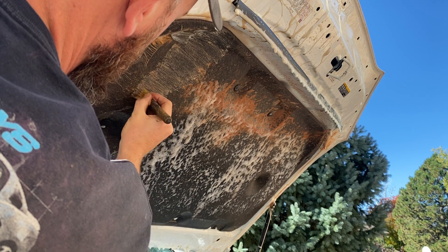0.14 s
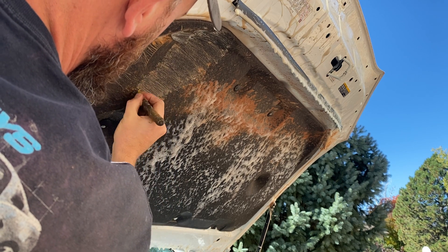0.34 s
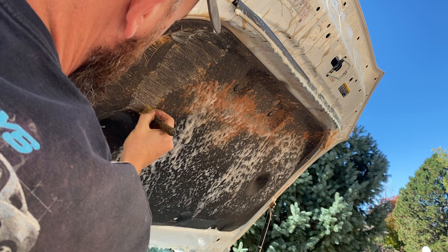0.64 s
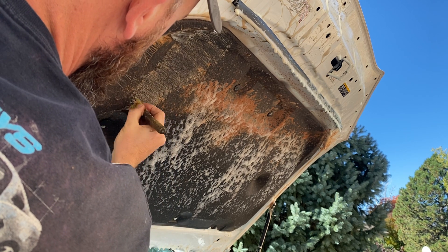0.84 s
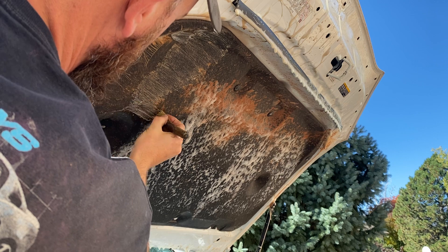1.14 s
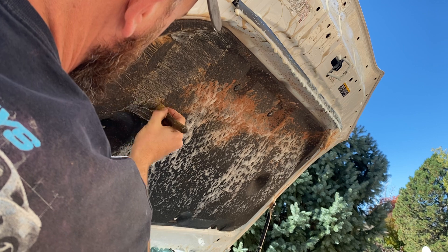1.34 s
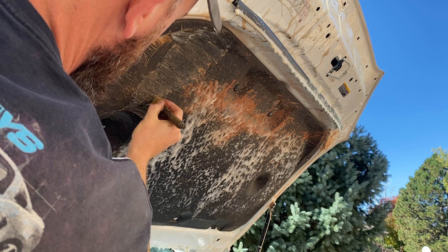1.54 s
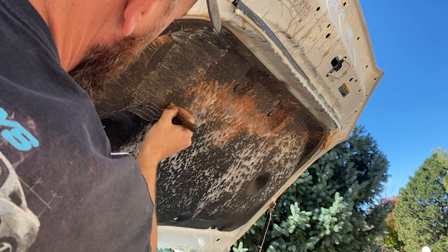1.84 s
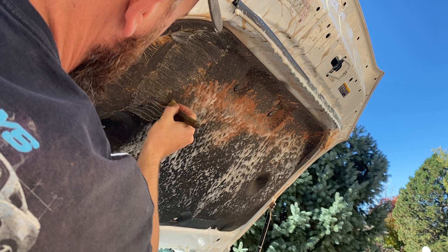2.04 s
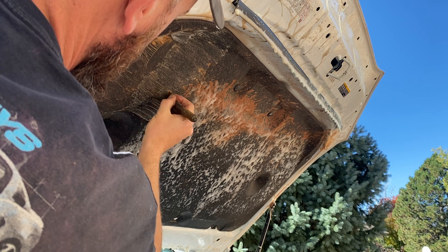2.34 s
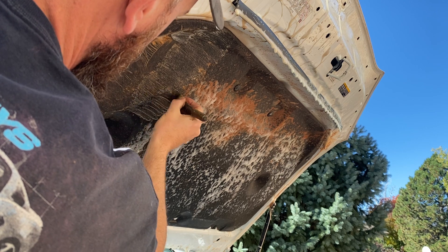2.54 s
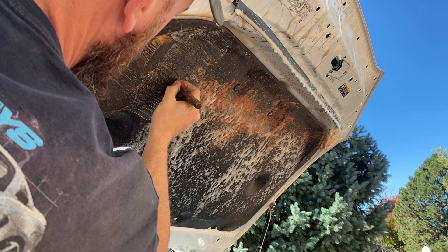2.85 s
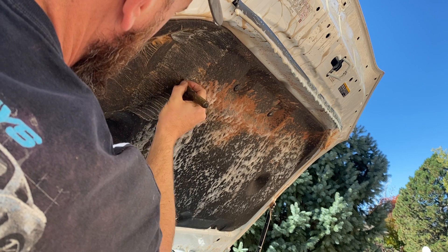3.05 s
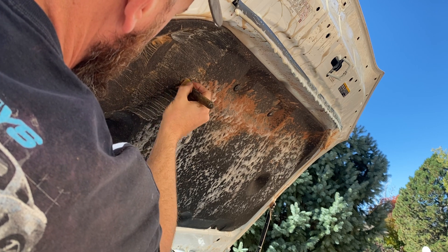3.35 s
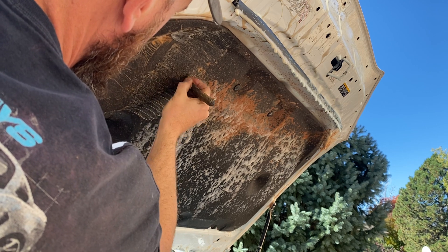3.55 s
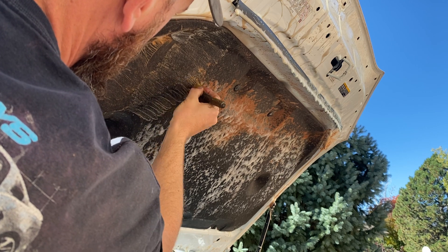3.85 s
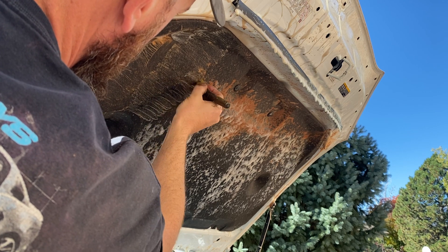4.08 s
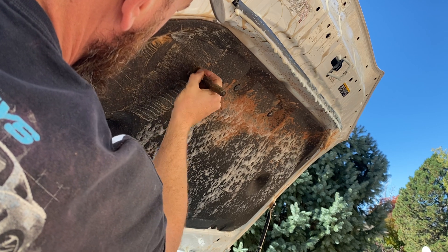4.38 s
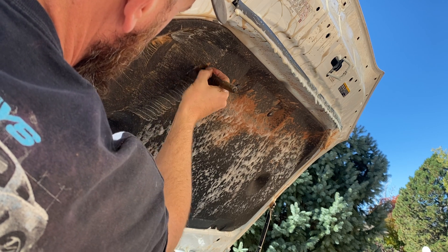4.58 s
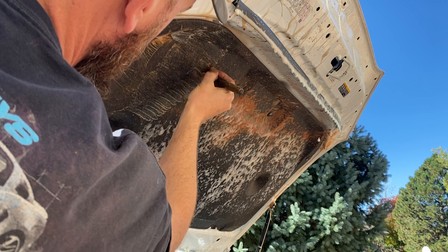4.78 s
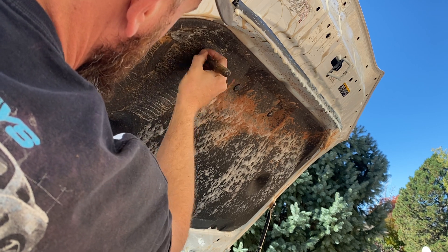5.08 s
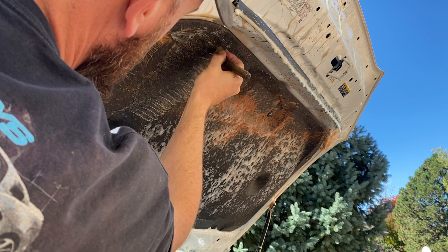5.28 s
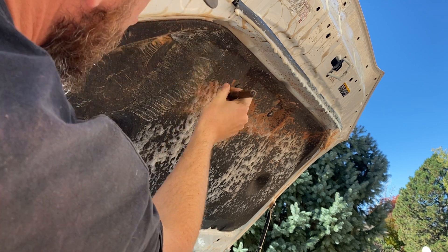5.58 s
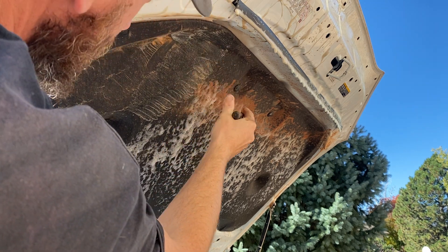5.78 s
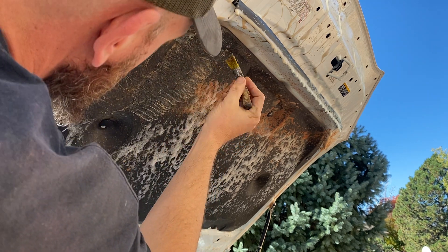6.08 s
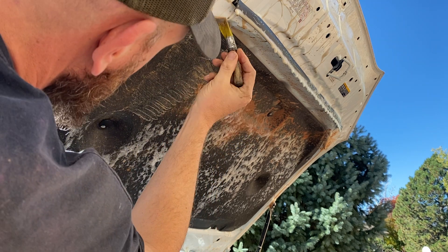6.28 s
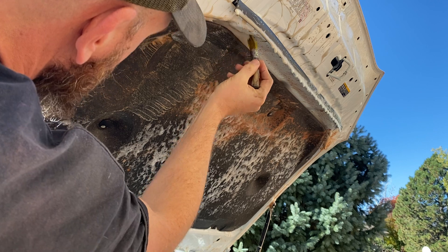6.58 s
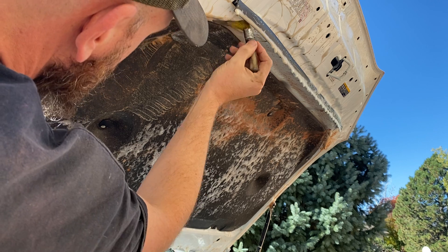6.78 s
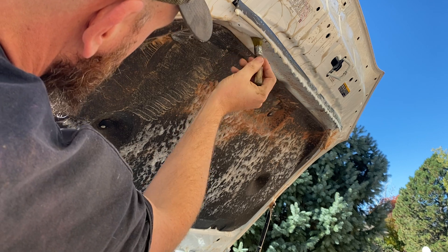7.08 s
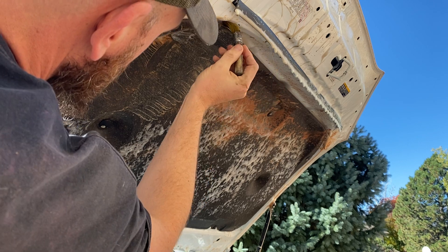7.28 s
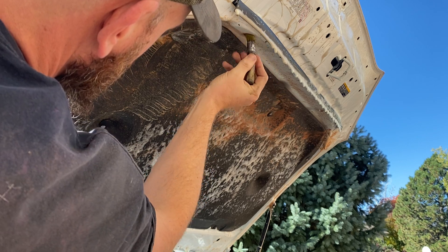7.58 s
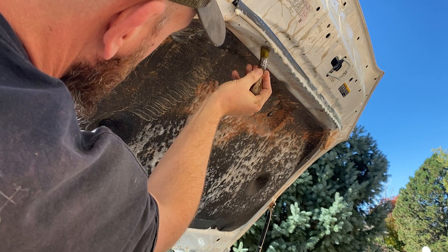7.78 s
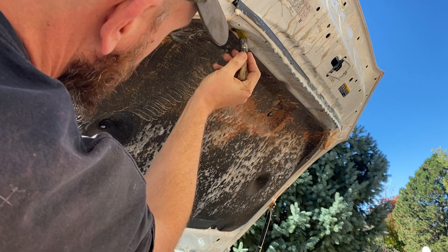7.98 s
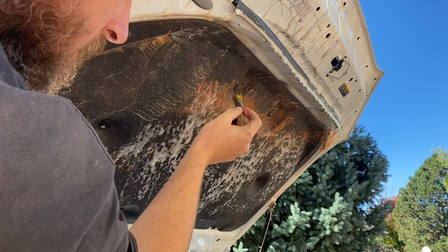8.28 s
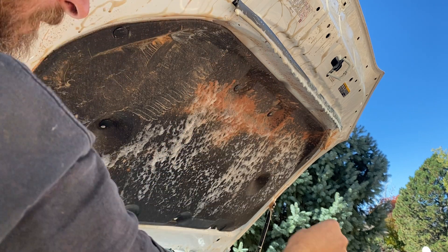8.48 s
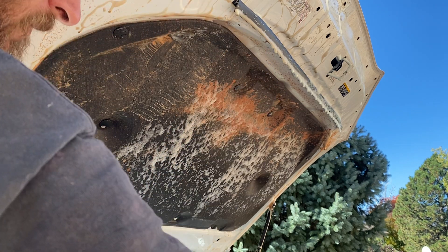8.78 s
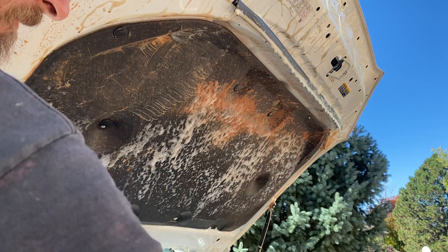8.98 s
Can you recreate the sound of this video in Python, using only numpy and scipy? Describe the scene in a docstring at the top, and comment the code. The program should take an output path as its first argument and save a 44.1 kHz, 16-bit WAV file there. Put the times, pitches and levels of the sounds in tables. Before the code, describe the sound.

Fast, dry bristle scrubbing close by over low street rumble and a swelling truck engine, then sparse gentle strokes, a cloth rustle and handle knocks.

```python
"""Outdoors, under a raised car hood, a hand scrubs a rough pad with a small brush: quick strokes, then
slower ones along the rim. Brush and sleeve are dense random ticks, coloured in stereo by short-time filtering.
The brush is put down with soft knocks, sums of decaying modes. In the street a truck pulls away, lifts off
and coasts, as wavering harmonics of its engine cycle with later engine hums; shaped noise makes the far wash
of traffic, and gliding sines a small bird. A stereo recorder is close by."""
import sys
import numpy as np
from scipy import signal
from scipy.fft import rfft, irfft, next_fast_len
from scipy.io import wavfile
from scipy.ndimage import uniform_filter1d

SR = 44100
rng = np.random.default_rng(int(sys.argv[2]) if len(sys.argv) > 2 else 0)


def pcm_store(signal):
    """Save signal as 16-bit PCM."""
    levels = np.round(np.clip(np.atleast_2d(signal), -1, 1) * 32767)
    wavfile.write(sys.argv[1], SR, levels.astype(np.int16).T)


N = 402633
TIME = np.arange(N) / SR

# street noise: (time [s], relative level of deep rumble [dB], of exhaust roar [dB], of tyre wash [dB])
STREET = [(0, -46, -55, -61.5), (.35, -46.5, -56, -59.5), (1.3, -46, -59, -58.5), (1.83, -46, -54.5, -58),
          (2.6, -46, -54, -56.5), (3.2, -41.5, -51, -54.5), (3.89, -43.5, -46, -52),
          (4.37, -41, -50.5, -56.5), (4.9, -42.5, -56, -55), (5.74, -48.5, -57.5, -57.5),
          (6.61, -47.5, -66, -57.5), (7.14, -47, -73, -59.5), (7.86, -48, -63, -58),
          (8.32, -50.5, -61.5, -60), (8.82, -46.5, -60.5, -58), (9.13, -53, -57, -57.5)]
# spectral shapes of the three street noises: (frequency [Hz], relative level [dB])
RUMBLE = [(25, -35), (40, -8.5), (60, 5), (110, -6), (170, -13), (260, -18), (400, -55)]
ROAR = [(90, -23), (160, 1), (250, 1.5), (350, -10.5), (500, -9), (800, -29), (1500, -43)]
WASH = [(180, -27), (300, -9), (417, -4), (476, -8), (744, -5.5), (863, -7.5), (1070, -8), (1180, -10.5),
        (1420, -11.5), (2040, -21), (4420, -41.5), (5760, -41), (15500, -50)]
# street at the two microphones: (frequency [Hz], likeness [0-1], phase by which right leads [rad])
STREET_PAIR = [(60.3, 0.99, 0.5), (204, 0.96, -0.5), (377, 0.84, -0.36), (760, 0.07, -2.5), (1324, 0.06, 4),
               (2580, 0.46, -7), (4350, 0.05, -6.5), (6540, 0.7, 8), (9000, 0.8, 5), (15500, .85, 9)]
# rate of the truck's engine cycle: (time [s], rate [Hz])
TRUCK_SPEED = [(0, 15.7), (.6, 16.8), (1.2, 18.2), (1.8, 19.5), (2.4, 20.6), (3, 21.56), (3.6, 22.4),
               (4.1, 22.9), (4.46, 23.1), (4.7, 21.3), (5, 18.7), (5.35, 15.9), (5.7, 14), (6.1, 13.1),
               (6.6, 12.8)]
# orders (multiples) of the cycle: (time [s], relative level of the lower order [dB], of the higher [dB])
ORDERS_3_5 = [(0, -52, -44), (.8, -50, -44.5), (1.1, -41, -38), (1.34, -48, -55), (1.55, -48.5, -38.5),
              (2.06, -49, -40.5), (2.3, -39, -31.5), (2.8, -39, -39), (3.21, -30, -30), (3.42, -36, -38),
              (3.72, -27.5, -32.5), (3.87, -44, -39.5), (4.07, -29.5, -35.5), (4.4, -32, -43.5),
              (4.51, -43.5, -38), (4.65, -24.5, -54), (4.79, -51, -60), (4.94, -36, -42), (5.25, -47, -42),
              (5.5, -43, -38.5), (5.9, -49, -43), (6.59, -60, -48)]
ORDERS_4_8 = [(0, -50, -58), (1.05, -57, -53), (1.44, -67, -61), (1.82, -49, -42.5), (2.14, -50, -54),
              (2.3, -43, -47.5), (2.66, -62, -44), (2.99, -51, -42.5), (3.3, -50, -47), (3.76, -50, -48),
              (4.37, -51, -34.5), (4.51, -60, -43.5), (4.62, -35.5, -47.5), (4.94, -38, -39.5),
              (5.3, -34, -48), (5.7, -52, -56), (6.59, -65, -54)]
# weak orders: (time [s], relative level of order 2 [dB], of order 6 [dB], of a whine at order 11.4 [dB])
ORDERS_WEAK = [(0, -62, -52.5, -68), (1.8, -62, -49.5, -62), (2.5, -62, -45, -67),
               (3.12, -50, -43.5, -52.5), (3.73, -52, -54, -52), (4.32, -48, -53, -54.5),
               (4.74, -69, -61, -60.5), (6.59, -65, -49, -65)]
# wavering late engine hums, partly the truck idling on: (time [s], frequency [Hz], relative level [dB])
HUM_STRONG = [(6.3, 106.9, -49), (6.6, 102.5, -39.5), (6.7, 102, -50.5), (7.14, 103, -42),
              (7.5, 102.8, -38), (7.6, 103, -50), (7.7, 103.9, -40), (8.7, 105.2, -42), (8.8, 105.5, -37.5),
              (9.13, 105.6, -45.5)]
HUM_HIGH = [(7.4, 138, -68), (7.7, 143.3, -55), (8.25, 143, -62), (8.88, 146.1, -49), (9.13, 140, -62)]
HUM_RISING = [(7.9, 57.9, -53), (8.22, 62.93, -43.5), (8.69, 69.73, -44.5), (9.13, 72.3, -43)]
HUM_LOW = [(6.4, 57.2, -50), (7.2, 49, -51.5), (7.6, 56.8, -49), (9.13, 55.5, -51)]
# a small bird, far and very high, one table a note: (time [s], frequency [Hz], level [dB])
BIRD_NOTES = [
    [(5.915, 7900, -92), (5.94, 9400, -88), (5.965, 10800, -88), (5.99, 10700, -90)],
    [(6.0, 9500, -84), (6.04, 9050, -85), (6.06, 9200, -85), (6.11, 8700, -87), (6.14, 7900, -88),
     (6.17, 7900, -92)],
    [(6.225, 7850, -92), (6.255, 8250, -86), (6.285, 7800, -92)],
    [(6.62, 8300, -90), (6.65, 8050, -83), (6.675, 7750, -90)],
]
# tiny dry ticks: (time [s], relative level at onset [dB])
TICKS = [(5.6, -56), (6.232, -63), (8.52, -60)]
# soft bumps through the hood: (time [s], level at onset [dB], frequency [Hz])
THUDS = [(0.414, -32, 131), (.435, -28, 101), (0.469, -29.5, 93)]
# the handle knocks and bounces: (time [s], relative level [dB], left minus right [dB])
KNOCKS = [(8.806, -54, 1), (8.84, -47, -2), (8.85, -50, 0), (8.858, -50, 0), (9.025, -46.5, -3),
          (9.037, -51, -5)]
# modes of the handle: (frequency [Hz], relative level [dB], time to decay 60 dB [s])
KNOCK_MODES = [(610, 5, 0.034), (1170, -4, .03), (1690, -10, .02), (4220, -16, .01)]
# cloth rustles: (start time [s], length [s], relative level [dB], change of level over the length [dB])
SLEEVE = [(5.453, 0.22, -75, 3), (5.718, 0.14, -75, -8), (5.93, 0.32, -82, -11), (8.15, .06, -80, -10),
          (8.23, 0.15, -80, 4), (8.343, .22, -67, -7.5), (8.657, 0.07, -85, 0)]
# the brush slides as it is put down: (time [s], relative level [dB])
WIPE = [(8.785, -98), (8.802, -58), (8.815, -68), (8.84, -58.5), (8.92, -63), (9.0, -61.5), (9.1, -69),
        (9.13, -76)]
# how sleeve and sliding brush reach the two microphones:
# (frequency [Hz], relative left level [dB], relative right level [dB], likeness [0-1], right leads [rad])
SLEEVE_COLOUR = [(1500, -8, -8, 0.96, -8), (2700, -12, -21, 0.58, 5), (4230, -2, -3, 0.67, -9),
                 (5000, -9, -7, 0.48, -0.58), (5860, -4, -8, 0.71, 3), (6600, -7, -7, 0.74, -9),
                 (8800, -4, -3, 1, 1.5), (10500, -2, -3, 0.92, 0.5), (12500, -18.0, -15, 0.84, -1),
                 (15500, -19, -18, 0.86, 3)]
WIPE_COLOUR = [(900, 6, 7.5, 0.79, 5), (2110, 3.1, 1, 0.65, 0), (3366, -0.3, -7, 0.39, -7),
               (5000, -1, -5.6, 0.6, 1.5), (6600, -3.5, -4, 0.96, -0.5), (10500, -1.5, -2, 0.78, 0.5),
               (15500, -7.0, -6, 0.87, 0.18)]
# how four spots on the pad reach them, same columns
PAD_LOW = [(900, -6, -11, 1, 0), (1460, -7.5, -6, 0.73, -1.2), (2060, -10, -14.5, 0.6, -1.5),
           (2780, -0.5, -8, 1, -2.5), (3400, -1.5, -13, 0.1, 0.5), (4200, -1.3, -6, 0.94, 1),
           (5000, -1, -4.5, 0.78, -0.3), (5660, -1, -3.5, 0.9, -0.5), (6500, -0.5, 0.5, 1, -0.5),
           (7840, -4.5, -4, 0.8, -1), (8900, -4.1, -5, 0.76, 0.7), (10500, -6.5, -5.5, 0.88, -0.35),
           (12400, -10.5, -11, 1, 0), (15500, -11, -10, 0.7, 0.17)]
PAD_MIDDLE = [(900, -8, -4.5, 0.83, -0.3), (1430, 1, -1, 1, -1.5), (2080, -6, -12, 0.51, -1),
              (2730, 0.5, -3, 0.64, -1.8), (3420, 0, -9, 0.72, -2), (4200, 0, -7, 0.3, 1.5),
              (5060, 1, -14, 0.32, 0.3), (5940, -2, -1, 0.49, -0.5), (6600, -0.5, -10.5, 0.73, 0.5),
              (7600, -3, 1.5, 0.85, -0.1), (9000, -0.5, -2.5, 1, 0.3), (10700, -5, -3.5, 0.86, 0),
              (12700, -9, -10, 1, -0.11), (15500, -11.3, -10, 0.87, 0)]
PAD_HIGH = [(900, -6, -5, 0.77, 8), (1530, -4, -6, 1, 5), (2080, -4, -7, 0.42, 5),
            (2700, 0.5, -2, 0.84, 4.5), (3470, 0, -3, 0.65, 5), (4130, -4.5, -8.4, 0.57, 4),
            (5100, -5, -13, 0.34, 4), (5730, -1.5, -18, 0.21, 3), (6650, -8, -6.5, 0.5, 1),
            (7700, -3.5, -8, 0.82, 0), (8800, -7.5, -6, 1, 0), (10500, -8, -8.5, 0.98, 0.2),
            (12600, -10, -9.5, 1, 0), (15500, -14.4, -16, 0.89, 0)]
PAD_RIM = [(900, 2.5, 5.5, 0.39, -0.73), (1510, -13, -1, 0.58, 0.1), (2110, -2, -9, 1, -0.084),
           (2700, -4.5, -7, 0.82, -0.7), (3400, -1.5, -5, 1, -1.1), (4180, -3.5, -4.5, 0.72, -0.83),
           (4900, 0, -4, 0.66, -1.2), (5800, -6.5, -5, 0.67, -0.66), (6600, -6, -7, 0.96, -0.39),
           (7600, -3.5, -5.5, 0.92, -0.55), (9000, -2, -0.9, 0.9, 0.49), (10500, -2.5, -2.5, 0.77, 0.12),
           (12500, -2.5, -2.5, 1, 0.19), (15500, -5, -4, 0.93, 0.0073)]
# when the brush works at each of the four spots: time [s]
SPOT_S = [.9, 2.9, 4.8, 6.0]
# one row a brush stroke, pull and push in turn: (start time [s], length [s], relative peak level [dB])
STROKES = [(-0.051, 0.13, -52.5), (0.041, 0.16, -48), (0.162, 0.165, -53), (0.291, 0.15, -49.3),
           (0.395, 0.171, -54.5), (0.522, 0.16, -49.5), (0.619, 0.19, -55.5), (0.763, 0.147, -48.3),
           (0.863, 0.19, -52), (1.001, 0.15, -46.5), (1.11, 0.16, -51.1), (1.239, 0.14, -46),
           (1.353, 0.141, -51), (1.47, 0.132, -45), (1.569, 0.16, -51.5), (1.694, 0.14, -45.5),
           (1.798, 0.16, -52.0), (1.919, 0.15, -49.5), (2.02, 0.169, -53.5), (2.147, 0.15, -49.5),
           (2.246, 0.16, -53.0), (2.371, 0.15, -49.5), (2.471, 0.16, -53.5), (2.597, 0.14, -48.5),
           (2.702, 0.16, -50), (2.82, 0.145, -48.5), (2.927, 0.16, -51.0), (3.048, 0.14, -48),
           (3.155, 0.15, -51.5), (3.272, 0.14, -49.5), (3.36, 0.18, -52.5), (3.482, 0.16, -50.5),
           (3.583, 0.19, -53.5), (3.709, 0.16, -50.3), (3.82, 0.165, -53), (3.937, 0.16, -50),
           (4.042, 0.17, -52.5), (4.163, 0.146, -49), (4.266, 0.17, -52), (4.391, 0.15, -49),
           (4.496, 0.16, -49.5), (4.613, 0.15, -47), (4.729, 0.14, -49.5), (4.835, 0.151, -48.5),
           (4.947, 0.15, -50), (5.064, 0.15, -43.5), (5.173, 0.12, -51), (5.344, 0.14, -47),
           (6.318, 0.24, -68), (6.408, 0.26, -61), (6.615, 0.265, -70.9), (6.708, 0.45, -60),
           (7.072, 0.29, -59.3), (7.284, 0.34, -55), (7.533, 0.21, -56), (7.701, 0.19, -66.5),
           (7.853, 0.22, -62), (7.98, 0.21, -64)]

FRAME, HOP = 256, 64  # short-time spectra of the bristles [samples]
EDGE_HZ = 15740  # upper band limit
SKEW_FROM_HZ, SKEW_TURN_HZ = 6500, 3720  # above the first, right gains one turn of phase per step
LAG = 9  # samples by which engine bass reaches the right side later
LEAN, PEAKED = 1.18, 4.88  # the stroke's peak comes a little late; how narrow the swell is
DRAG_DB, DRAG_S = -18, 0.022  # bent bristles spring back after each swell: level, time constant
PULL_DB, PUSH_DB = -2, 0.  # brightness of each direction
SWING_DB, SLOW_DB = 2.5, -2.5  # brightness added in full swing; brightness at the turn
RUSTLE_EDGE_S = 0.023  # longest fade at each end of a rustle


def amp(db):
    """Decibel law: level to amplitude ratio."""
    return 10 ** (np.asarray(db) / 20)


def evened(x):
    """Normalisation to unit rms."""
    return x / np.sqrt(np.mean(abs(x) ** 2) + 1e-20)


def columns(rows, at, outside=None):
    """Linear interpolation of every column of a table at the given times or frequencies."""
    key, *values = np.transpose(rows)
    return [np.interp(at, key, v, outside, outside) for v in values]


def add(mix, s, sound):
    """Superposition: a sound is added in place from time s, cut at the end of the mix."""
    part = mix[..., max(round(s * SR), 0):][..., :sound.shape[-1]]
    part += sound[..., :part.shape[-1]]


def drift(hz):
    """Slow random modulation: noise low-passed at hz, rms 1."""
    noise = rng.standard_normal(N // HOP + 1)
    slow = signal.lfilter(*signal.butter(2, hz, fs=SR / HOP), noise)
    return np.interp(np.arange(N) / HOP, np.arange(len(slow)), evened(slow))


def tone(hz, db, waver, fading_db):
    """Phase and amplitude modulation: a sine about rms level db, whose phase and level wander."""
    level = np.sqrt(2) * amp(db + fading_db * drift(3.7))
    turns = np.cumsum(hz) / SR + rng.random()
    return level * np.sin(2 * np.pi * turns + waver * drift(6.5))


def pair(a, b, left, right, like, frame):
    """Partial coherence: right mixes spectrum a, shared with left, and its own b by complex likeness."""
    own = np.sqrt(np.clip(1 - abs(like) ** 2, 0, 1))
    z = np.array([left * a, right * (like * a + own * b)])
    return signal.istft(z, nperseg=frame, noverlap=frame - frame // 4)[1][:, :N]


def smooth_patches(noise, width_0, width_1):
    """Moving average along two axes: random patches of unit rms."""
    return evened(uniform_filter1d(uniform_filter1d(noise, width_0, 0), width_1, 1))


def street():
    """Filtered noise: rumble, roar and wash as random spectra, each with its own swell, lightly patchy."""
    hz = np.fft.rfftfreq(1024, 1 / SR)
    t = np.arange(N // 256 + 5) * 256 / SR
    a, b, c, d, patches = rng.standard_normal((len(t), 513, 5)).T
    patches = smooth_patches(patches, 10, 14)
    power = 0
    for shape, db in zip((RUMBLE, ROAR, WASH), columns(STREET, t)):
        shape_hz, shape_db = np.transpose(shape)
        colour_db = np.interp(np.log(hz + 1), np.log(shape_hz), shape_db, -100, -100)
        power = power + np.outer(evened(amp(colour_db)), amp(db)) ** 2
    patchy_db = (1.28 + 0.92 * np.clip(hz / 5000, 0, 1))[:, None]
    gain = np.sqrt(power) * amp(patchy_db * patches) / np.sqrt(1024)
    like, phase = columns(STREET_PAIR, hz)
    like = (np.clip(like, 0, 1) * np.exp(1j * phase))[:, None]
    return pair(a + 1j * b, c + 1j * d, gain * amp(6.0), gain * amp(7.0), like, 1024)


def engines():
    """Harmonic series: orders of the truck's cycle, then late hums; bass reaches both sides nearly alike."""
    cycle = columns(TRUCK_SPEED, TIME)[0]
    out = np.zeros(N)
    for orders, rows in (((3, 5), ORDERS_3_5), ((4, 8), ORDERS_4_8), ((2, 6, 11.4), ORDERS_WEAK)):
        for order, db in zip(orders, columns(rows, TIME)):
            out += tone(order * cycle, db, 0.13, 1.32)
    # the orders of the cycle give way to the idling hums
    out *= np.clip((TRUCK_SPEED[-1][0] - TIME) / 0.13, 0, 1)
    for rows, waver in ((HUM_STRONG, .3), (HUM_HIGH, .8), (HUM_RISING, 1.5), (HUM_LOW, 1.5)):
        fade_in = np.clip((TIME - rows[0][0]) / 0.081, 0, 1)
        out += fade_in * tone(*columns(rows, TIME), waver, 2.0)
    late = np.concatenate([np.zeros(LAG), out[:-LAG]])
    return np.array([out * amp(0.17), late * amp(1.04)])


def bird():
    """Frequency modulation: thin gliding whistles, the phase being the integral of frequency."""
    out = np.zeros(N)
    for rows in BIRD_NOTES:
        t = np.arange(rows[0][0], rows[-1][0], 1 / SR)
        hz, db = columns(rows, t)
        whistle = np.sqrt(2) * amp(db) * np.sin(2 * np.pi * np.cumsum(hz) / SR)
        add(out, t[0], whistle * signal.windows.tukey(len(t), .3))
    return out


def ticks_and_thuds():
    """Exponential decay: ticks are noise losing 60 dB in 6 ms, thuds low sines losing 60 dB in 0.23 s."""
    out, t = np.zeros(N), TIME[:6000]
    for s, db in TICKS:
        bright_noise = np.diff(rng.standard_normal(len(t)))  # differencing favours the treble
        add(out, s, amp(db - 60 * t[1:] / .006) * bright_noise)
    for s, db, hz in THUDS:
        add(out, s, amp(db - 60 * t / 0.23) * np.sin(2 * np.pi * hz * t))
    return out


def knocks():
    """Modal synthesis: the handle's few damped modes ring at each knock."""
    out, t = np.zeros((2, N)), TIME[:6000]
    ring = sum(amp(db - 60 * t / t60) * np.sin(2 * np.pi * hz * t) for hz, db, t60 in KNOCK_MODES)
    for s, db, pan_db in KNOCKS:
        add(out, s, ring * amp(db + np.array([[pan_db / 2], [-pan_db / 2]])))
    return out


def spot(table, hz):
    """Transfer to two microphones: band-limited gains of unit mean power, and complex likeness."""
    left_db, right_db, like, phase = columns(table, hz)
    band = (hz > 600) * (hz < EDGE_HZ + 300)
    scale = np.sqrt(np.mean(band * (amp(left_db) ** 2 + amp(right_db) ** 2) / 2))
    left = band * amp(left_db) / scale
    right = band * amp(right_db) / scale
    return np.array([left, right, np.clip(like, 0, 1) * np.exp(1j * phase)])


def bristles(level, spots, spot_s, bright_db, per_s, spread_db, flutter_db, patchy_db):
    """Stick-slip friction: many tips catch and slip as dense, uneven, bunched ticks under a level."""
    bunch = level * amp(flutter_db * drift(90.) + flutter_db * drift(23.0))
    ticks = rng.standard_normal((2, N)) * (rng.random((2, N)) < per_s / SR)
    size_db = spread_db * np.minimum(rng.exponential(1, (2, N)), 4)
    ticks = evened(ticks * amp(size_db))
    hz, t, z = signal.stft(ticks * bunch, SR, nperseg=FRAME, noverlap=FRAME - HOP)
    # cross-fade between the colours of neighbouring spots
    colours = np.array([spot(s, hz) for s in spots])
    place = np.interp(t, spot_s, np.arange(len(spots)))
    share = np.clip(1 - abs(place - np.arange(len(spots))[:, None]), 0, 1)
    left, right, like = np.einsum("skf,st->kft", colours, share)
    # brightness tilts the spectrum about 6500 Hz
    slope = np.clip(np.log2((hz + 1) / 6500) / 1.8, -1, 1)[:, None]
    tilt_db = slope * np.interp(t, TIME, bright_db * np.ones(N))
    # narrow bands come and go
    patches = smooth_patches(rng.standard_normal(z[0].shape), 3, 28)
    z = z * amp(tilt_db + patchy_db * patches)
    return pair(z[0], z[1], left, right, like, FRAME)


def rustles():
    """Sliding friction: cloth rubs cloth as the body shifts; at the end the brush slides to rest."""
    level = amp(columns(WIPE, TIME, -150)[0])
    for s, length, db, change_db in SLEEVE:
        t = np.arange(0, length, 1 / SR)
        edges = np.clip(np.minimum(t, length - t) / RUSTLE_EDGE_S, 0, 1)
        add(level, s, amp(db + change_db * t / length) * edges)
    wipe_s = WIPE[0][0]
    return bristles(level, [SLEEVE_COLOUR, WIPE_COLOUR], [wipe_s - .02, wipe_s], 0, 25000, 1.4, 0.63, 3.0)


def brush():
    """Speed-dependent friction: strokes swell and brighten with speed; bent bristles drag at the turns."""
    power, bright = np.zeros(N), np.full(N, SLOW_DB)
    for k, (s, length, db) in enumerate(STROKES):
        t = np.arange(max(-s, 0), length, 1 / SR)
        swing = abs(np.sin(np.pi * (t / length) ** LEAN))
        add(power, s, amp(db) ** 2 * swing ** PEAKED)
        add(bright, s, ((PULL_DB, PUSH_DB)[k % 2] + SWING_DB) * swing ** 2)
    keep = np.exp(-1 / (DRAG_S * SR))
    power = power + amp(DRAG_DB) ** 2 * signal.lfilter([1 - keep], [1, -keep], power)
    pad = [PAD_LOW, PAD_MIDDLE, PAD_HIGH, PAD_RIM]
    return bristles(np.sqrt(power), pad, SPOT_S, bright, 30000, 1.5, 0.75, 1.62)


def scene():
    """Linear superposition of all sources, from the background to the brush."""
    return street() + engines() + bird() + ticks_and_thuds() + knocks() + rustles() + brush()


def record(dry):
    """Linear filtering: right's upper treble comes a little early, bass is cut, the band is limited."""
    size = next_fast_len(N + 4096)
    hz = np.fft.rfftfreq(size, 1 / SR)
    early = np.exp(2j * np.pi * np.maximum(hz - SKEW_FROM_HZ, 0) / SKEW_TURN_HZ)
    skewed = np.array([dry[0], irfft(rfft(dry[1], size) * early, size)[:N]])
    cut = signal.sosfilt(signal.butter(8, 39., "high", fs=SR, output="sos"), skewed)
    low_pass = signal.firwin(1023, EDGE_HZ, window=("kaiser", 9), fs=SR)
    return signal.oaconvolve(cut, low_pass[None], "same")


dry = scene()
out = record(dry)
pcm_store(out)
```